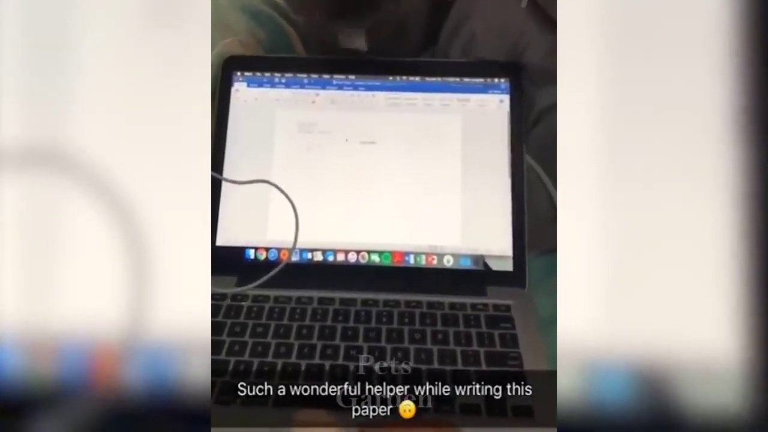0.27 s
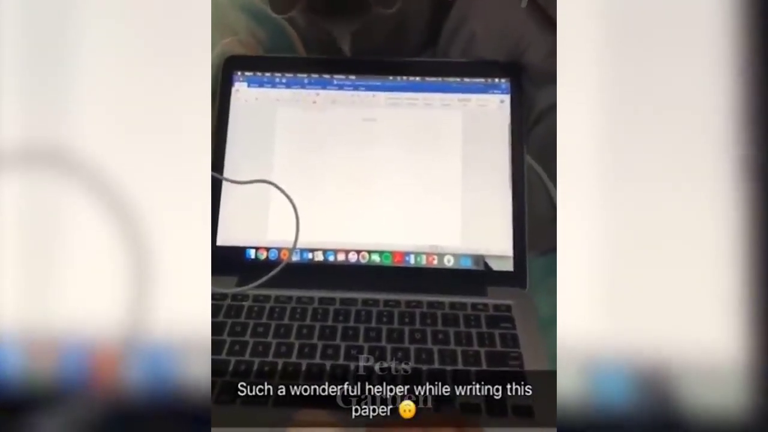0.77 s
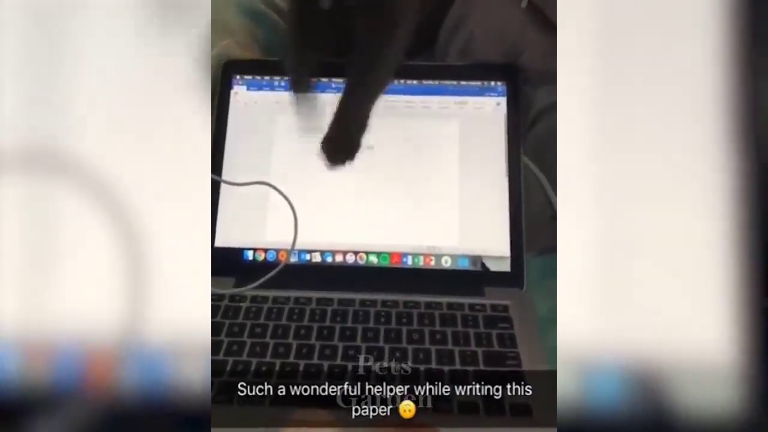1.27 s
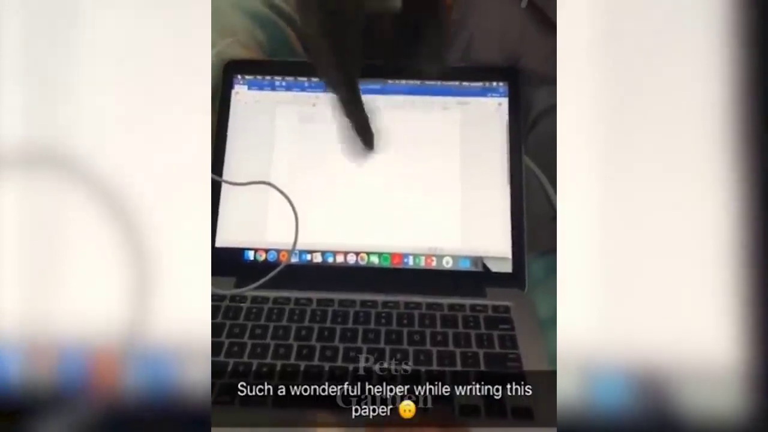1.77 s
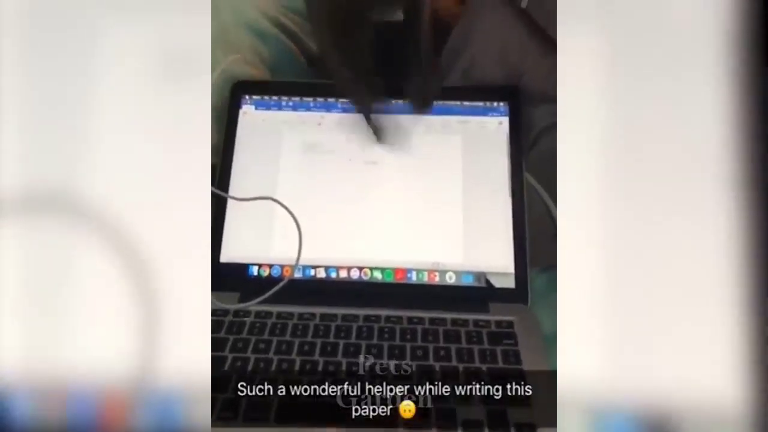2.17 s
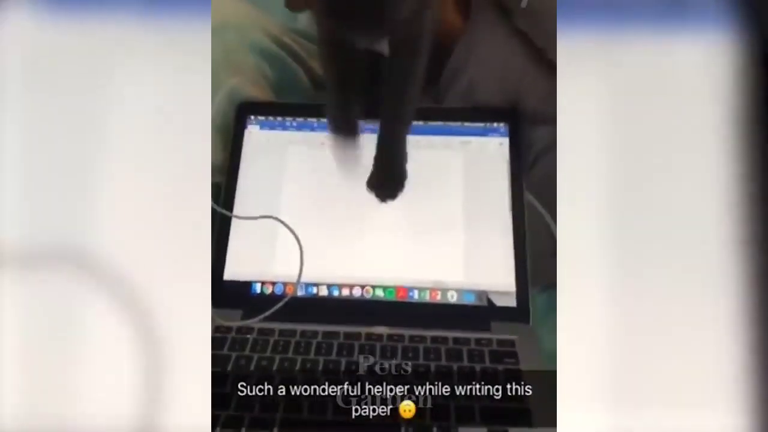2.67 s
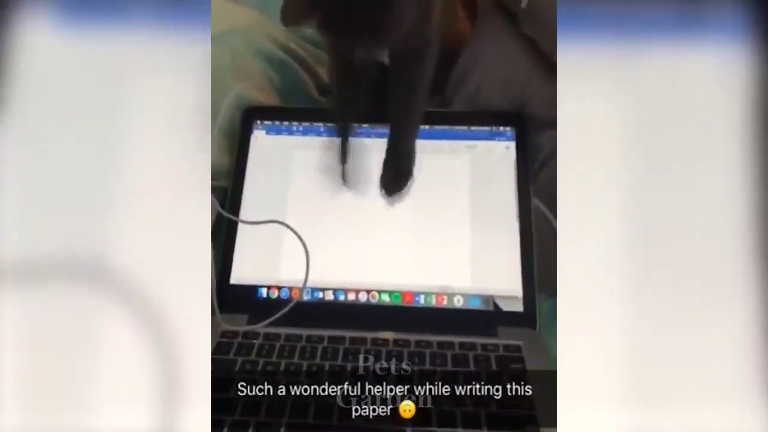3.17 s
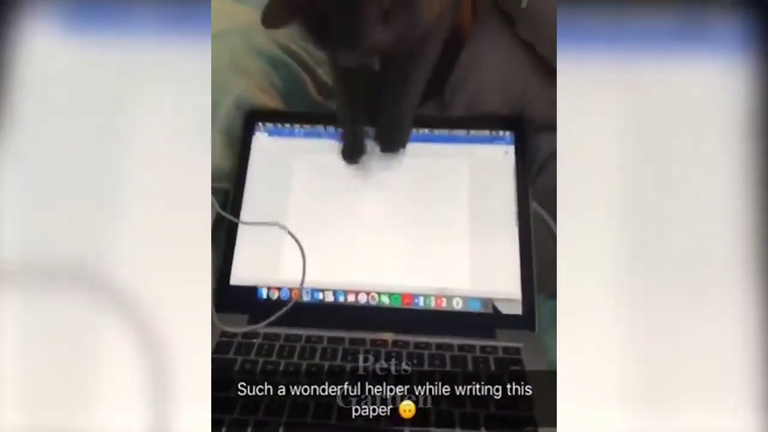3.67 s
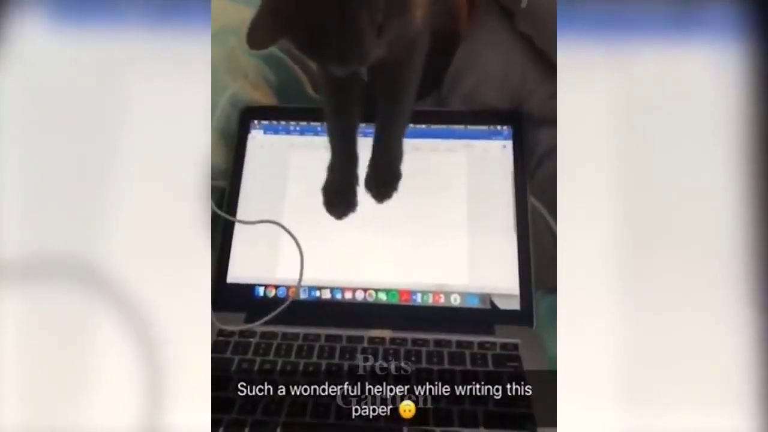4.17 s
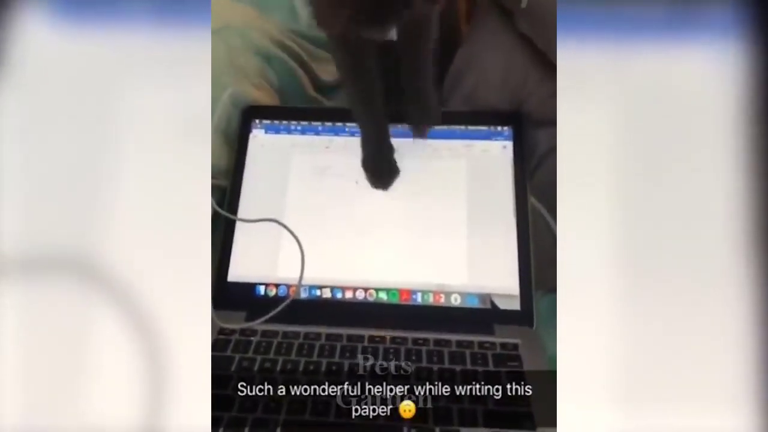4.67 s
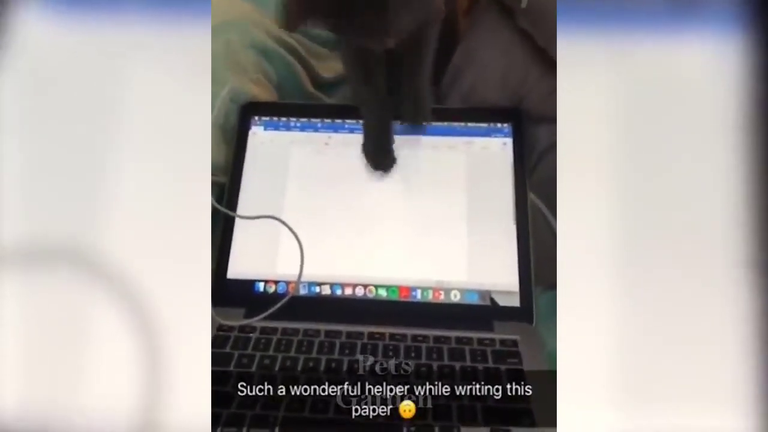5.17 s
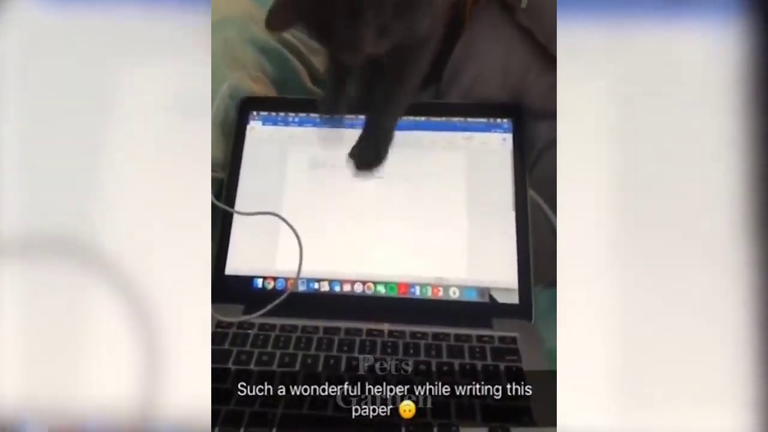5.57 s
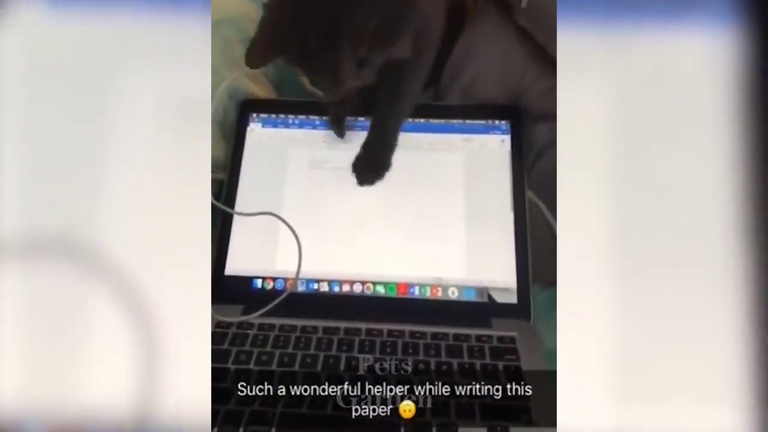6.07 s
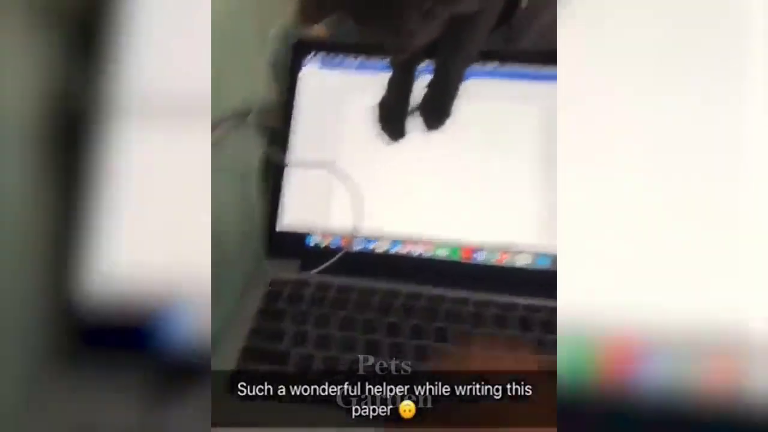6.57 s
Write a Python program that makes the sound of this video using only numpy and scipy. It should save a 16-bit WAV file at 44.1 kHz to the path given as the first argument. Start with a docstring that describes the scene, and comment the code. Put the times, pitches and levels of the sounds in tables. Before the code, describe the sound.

Uneven clicks and dull knocks of a cat pawing a laptop screen, its small collar bell jingling faintly in a quiet room.

```python
"""A cat pawing at a laptop screen

Claws tap and pads drag on the glass, exciting its damped bending modes by impact and by friction.
The lid thumps, knocks and sways on its hinge, and a pellet tinkles in the cat's collar bell.
Behind are faint squeaks, a soft puff of hiss and the hum and reverberation of a quiet room. The
microphone's gain control ducks after loud taps, and a swish swells just before the sound is cut off."""
import sys
import numpy as np
from scipy import signal
from scipy.io import wavfile
from scipy.ndimage import uniform_filter1d

SR = 44100
rng = np.random.default_rng(int(sys.argv[2]) if len(sys.argv) > 2 else 0)


def unload_wav(signal):
    """Save mono or channel-first audio to the path in sys.argv[1] as 16-bit WAV at rate SR, clipped to [-1, 1]."""
    wavfile.write(
        sys.argv[1],
        SR,
        np.round(np.clip(np.atleast_2d(signal).T, -1, 1) * 32767).astype(np.int16),
    )


N = 300895

# Claw impacts: t/s, peak level/dB, favoured low f/Hz, favoured high f/Hz, low-mode weight/dB,
# treble weight/dB, skid duration/ms, thump level/dB, thump f/Hz
CLAW_TAPS = [(1.181, -35, 1110, 3500, 4, -11.5, 10.2, -18.5, 149),
             (1.276, -7.0, 1148, 3550, -10, 1, 1.7, -20.5, 143),
             (1.2767, -9.5, 1207, 2640, -17, 1, 1.8, -44.5, 141),
             (1.2859, -29, 1200, 3200, -21, -13, 9.2, -46, 140),
             (1.497, -47, 1190, 3000, 3, -2, 2.8, -36, 75.5),
             (1.528, -43, 1050, 2900, 2, -11, 3.8, -44, 120),
             (1.5394, -31, 1260, 4350, -2.5, 7, 3.4, -32, 111),
             (1.569, -44, 1010, 3120, 1, -10, 4.8, -42, 120),
             (1.596, -50, 1150, 3200, 11, -10, 4.3, -52, 120),
             (1.9675, -34, 1080, 3940, -0.5, 12.5, 7.8, -17.5, 79.6),
             (2.004, -35, 1090, 3740, -1.5, 12, 3, -33, 151),
             (2.367, -43.5, 1290, 4600, -12, 9, 12, -55, 100),
             (2.389, -30, 1300, 2640, -2, 12, 6.6, -32.5, 226),
             (2.4039, -27, 1430, 4100, -7.5, -3, 1.2, -30.5, 75),
             (2.478, -40.5, 1340, 2500, -10, -3, 2, -49, 100),
             (2.591, -35, 1920, 3040, -20, 9, 4.8, -38, 73),
             (2.607, -18.5, 1814, 4350, -3, 10, 12.6, -27.5, 206),
             (2.6281, -23, 1700, 2320, -9, 5, 2.1, -33, 137),
             (2.671, -51.5, 1410, 3000, -7, -1, 2.1, -45, 100),
             (2.744, -46.5, 1300, 3660, -17, -9, 1.8, -55, 100),
             (2.8048, -16.5, 1310, 4430, -9, 6, 5.3, -26, 137),
             (2.887, -18, 1295, 3000, -9, 13, 1.7, -26.5, 137),
             (3.387, -34.5, 1290, 2986, -5, 10.5, 5.3, -56, 148),
             (3.392, -25.5, 1370, 3420, -4, -3, 7.4, -33.5, 160),
             (3.4346, -41.5, 1250, 3430, 9, -5.5, 1.6, -36, 73),
             (3.5691, -19.5, 1210, 3090, -8.5, 5, 5.9, -25.5, 145),
             (3.5865, -17, 1566, 3120, -6.5, 3, 4.8, -27, 71),
             (3.599, -46, 1255, 3220, 19, 14, 3.1, -42, 127), (3.625, -34, 1300, 2340, 3, 2, 1.4, -44, 73),
             (3.7329, -20.5, 1260, 4070, -11, 4.5, 7.2, -31, 71),
             (3.7518, -17.5, 1464, 4240, -1, 11.5, 1.7, -25.5, 139),
             (3.761, -29, 1280, 3680, -2, -6.5, 2.2, -40, 73),
             (3.7905, -25, 1250, 3260, 4.5, -20, 1.33, -58, 73),
             (3.896, -31, 1340, 3870, -14, -4, 2.7, -40, 89),
             (3.903, -34.5, 1320, 4050, -18, 10, 11.3, -48.5, 90),
             (3.931, -16.5, 1280, 3630, -8, 6, 7, -36.5, 103),
             (3.9443, -23, 1624, 3880, 2.5, -8, 1.4, -20, 216),
             (4.017, -19.5, 1355, 2800, -7.5, 4.5, 3.2, -30, 146),
             (4.0216, -28.5, 1290, 4430, -3, 13, 2.4, -48, 141),
             (4.493, -39.5, 1260, 2850, 21, -7, 3.8, -40, 156),
             (4.5329, -34.5, 1140, 4100, -13, -7, 4.1, -38, 84),
             (4.541, -39, 1150, 3320, -20, 17, 2.1, -26.5, 123),
             (4.5524, -32, 1110, 4330, -12, -8, 4.2, -39, 147),
             (4.6346, -14, 1810, 3830, -5, 4.5, 2.92, -29.5, 149),
             (4.781, -27.5, 1390, 3500, -8, 10, 6.3, -34, 138),
             (4.8783, -27, 1276, 3780, -13.5, -6, 2.5, -44, 118),
             (4.899, -37, 1410, 3460, -11, -10, 2.7, -45, 128),
             (5.409, -44, 1280, 3700, -8, -10.5, 2.4, -61.5, 100),
             (5.456, -25.5, 1290, 3850, -15.5, 7.5, 6.4, -36.5, 73.6),
             (5.5409, -20, 1490, 3590, -12, 7.5, 4.5, -33.5, 96.5),
             (5.72, -15.5, 1330, 3391, -16.5, 5, 3.55, -30, 136),
             (5.8091, -19, 1164, 2800, -8.5, 3.5, 4.1, -30, 168),
             (5.8337, -28, 1100, 4200, -18, 3.5, 3.36, -29.5, 130),
             (5.9326, -21.5, 1550, 3480, -9.5, -1, 3.6, -36, 207),
             (5.9446, -28, 1630, 4450, -27, -14, 3.3, -36, 135),
             (5.993, -44, 1420, 3000, 0, -11.5, 1.9, -56, 100),
             (6.0624, -21, 1130, 3610, -8, 5, 3.5, -41.5, 250),
             (6.1803, -20.5, 1490, 3200, -2.5, 2, 3.9, -30.5, 142),
             (6.3269, -25, 1260, 4570, -11, 3.5, 7.8, -40, 82),
             (6.436, -28.5, 1610, 3600, -1, 4, 7.5, -36.5, 104)]
# Modes of the glass panel, damped by paw and lid: f/Hz, level/dB, T60/s
GLASS_MODES = [(389, -11, 0.02), (575, -7.5, 0.017), (624, -13.5, 0.019), (810, -14, 0.014),
               (1107, -6, 0.02), (1259, 0.5, 0.014), (1503, -1, 0.012), (1690, 0, 0.0078),
               (2305, -11.5, 0.02), (2656, -8.5, 0.013), (3223, 4, 0.0043), (3496, -4.5, 0.0091),
               (3765, -4, 0.0081), (4315, -1.5, 0.0077), (4660, -24.5, 0.0017), (5790, -3, 0.0021),
               (6690, -20, 0.015), (7440, -13, 0.0038), (8820, -5.5, 0.00071), (9500, -36, 0.0016),
               (9450, -20, 0.014), (11200, -0.5, 0.00075), (12100, -3, 0.00079), (14800, -17, 0.001)]
# Pad blows on the lid: t/s, level/dB, lower f/Hz, upper f/Hz, relative upper level/dB
LID_KNOCKS = [(1.182, -25.5, 334, 570, 2), (1.276, -23, 334, 517, -4), (1.538, -28, 297, 650, -12.5),
              (1.969, -23, 330, 530, -9), (2.005, -26, 334, 690, -6), (2.391, -30.5, 280, 533, -6),
              (2.606, -34, 320, 552, 8.5), (2.804, -39, 280, 890, -15), (2.887, -53.5, 283, 710, -15.5),
              (3.394, -28.5, 440, 540, -9), (3.574, -30, 425, 482, -3), (3.586, -26.5, 283, 518, 2),
              (3.734, -29, 320, 510, -8.5), (3.751, -29, 344, 560, -3), (3.931, -32, 283, 875, -25),
              (3.944, -21, 285, 668, -24), (4.015, -36, 283, 534, -6), (4.489, -37.5, 282, 890, -1),
              (4.542, -32.5, 393, 647, -1.5), (4.634, -32.5, 323, 666, 4.5), (4.782, -46.5, 396, 590, 9),
              (4.877, -39.5, 374, 520, 1), (5.456, -30, 283, 664, -10), (5.54, -38, 439, 526, -8),
              (5.719, -34, 440, 520, 6.5), (5.809, -47, 307, 614, -9), (5.932, -44, 304, 690, 10),
              (6.062, -33, 287, 664, -6), (6.18, -42, 283, 686, -4), (6.329, -36.5, 428, 490, -5),
              (6.436, -36.5, 283, 540, -2)]
# Pushes that sway the lid: t/s, level/dB
LID_PUSHES = [(.45, -53), (.78, -55), (1.15, -37.5), (1.36, -40), (1.56, -50.5), (2.01, -36.5),
              (2.42, -43.5), (2.66, -41.5), (2.89, -51.5), (3.1, -51), (3.6, -42), (3.76, -42),
              (3.97, -45.5), (4.06, -56), (4.45, -55.5), (4.67, -51.5), (4.95, -46.5), (5.12, -63.5),
              (5.29, -59), (5.52, -46.5), (5.77, -55), (5.98, -48.5), (6.28, -49.5), (6.65, -65)]
# Pad strokes on the glass: start t/s, end t/s, start level/dB, end level/dB, treble tilt/dB
PAD_STROKES = [(1.189, 1.219, -56, -74, -1), (1.333, 1.436, -55.5, -75, -3.5), (1.47, 1.522, -69, -65, 0.5),
               (1.558, 1.752, -65, -72.5, 0.5), (2.014, 2.147, -60, -80.5, 0),
               (2.406, 2.606, -58.5, -62.5, 2), (2.634, 2.797, -60, -63.5, 1), (2.828, 2.87, -54, -78, 5),
               (2.917, 2.98, -70, -84, 9), (2.983, 3.322, -71.5, -77, 1), (3.33, 3.369, -79, -58, -2),
               (3.396, 3.592, -61.5, -69, 0.5), (3.638, 3.717, -61.5, -63, -1.5),
               (3.808, 3.9, -61, -60.5, 0), (3.954, 4.003, -52, -70, 9), (4.045, 4.219, -65, -72, 0),
               (4.423, 4.53, -70, -54.5, -1), (4.548, 4.627, -57, -67, 4), (4.66, 4.765, -58, -81, 4),
               (4.803, 4.86, -60, -71, 1), (4.91, 5.088, -59.5, -72, 1.5), (5.098, 5.2, -60, -74, 3),
               (5.273, 5.439, -67.5, -59, 1), (5.48, 5.517, -67, -80, -8), (5.565, 5.692, -67, -54, 3.5),
               (5.735, 5.806, -70, -55.5, 2.5), (5.817, 5.846, -53, -55.5, 3.5),
               (5.827, 5.92, -57.5, -66, 0.5), (5.958, 6.053, -74, -57.5, 6),
               (6.06, 6.114, -65, -55.5, 1.5), (6.114, 6.18, -67.5, -70, -2), (6.172, 6.328, -61, -66.5, 1),
               (6.34, 6.426, -61, -66, -1)]
# Pellet strikes in the bell: t/s, low-pair level/dB, high-pair level/dB, tick level/dB
PELLET_STRIKES = [(1.5204, -53, -62, -51), (1.5394, -53, -70, -39), (1.5484, -31.5, -50, -46),
                  (1.5704, -44, -57, -48), (1.6467, -49, -82, -49.5), (1.927, -50, -75, -54.5),
                  (1.934, -52, -74.5, -50), (1.9719, -24.5, -47, -37), (1.9878, -53, -43, -36),
                  (1.9994, -47.5, -65, -35), (2.0134, -46, -47, -42), (2.095, -52, -74, -55),
                  (2.138, -48.5, -87, -51), (2.331, -56, -76, -56), (2.34, -52, -70, -50.5),
                  (2.3695, -40, -58, -49), (2.3972, -32, -48, -36), (2.961, -44.5, -66, -52),
                  (3.045, -49.5, -76, -50), (3.1318, -45, -70, -51), (3.2255, -55, -88, -53),
                  (3.2973, -57, -65, -53), (3.3424, -58, -66, -58), (3.471, -54, -46, -49),
                  (3.6616, -49, -48, -55), (3.824, -48.5, -60, -59), (4.0043, -43, -77, -49),
                  (4.0705, -49, -85, -61), (4.0862, -49, -52, -48), (4.1215, -53, -84, -57),
                  (4.6924, -30.5, -68, -62), (4.7134, -49, -59, -52), (4.7476, -69, -67, -48),
                  (4.8265, -57, -76, -51), (4.851, -45, -76, -64), (4.9917, -40, -53, -54),
                  (4.997, -40, -55, -54), (5.0794, -49, -79, -56.5), (5.1502, -44, -80, -62),
                  (5.8734, -39, -50, -53), (5.8875, -43, -76, -62)]
# The bell's two close mode pairs and its short-lived tick modes: f/Hz, level/dB, T60/s
BELL_LOW_PAIR = [(4885, -16, .17), (4935, -21, .08)]
BELL_HIGH_PAIR = [(11850, -4, .09), (12065, -7, .07)]
BELL_TICK_MODES = [(4840, 6.5, 0.012), (5150, 5, 0.012), (5600, 1.5, 0.0093), (6730, 14.5, 0.0024),
                   (9300, -5.5, 0.0074)]
# Envelopes of the swish: t/s, dull-band level/dB, bright-band level/dB
SWISH_LEVELS = [(6.345, -62, -80), (6.42, -57, -76), (6.46, -50, -71), (6.482, -53.5, -55.5),
                (6.58, -50, -52.5), (6.667, -50, -48.5), (6.71, -52, -53.5)]
# Spectral density of the swish: f/Hz, relative level/dB
SWISH_SPECTRUM = [(290, -53.5), (500, -18.5), (542, -11.5), (892, -16.5), (1050, -10.5), (2110, -6.5),
                  (2660, -2), (3380, -10.5), (3670, -6.5), (4940, -11), (6040, -7.5), (8120, -23),
                  (11100, -22), (12500, -49), (16200, -65), (22000, -120)]
# Faint squeaks, a soft puff of hiss and a brief ring after a tap:
# t/s, level/dB, centre f/Hz, bandwidth/Hz, duration/s
NOISE_BURSTS = [(0.194, -64, 4020, 700, 0.065), (0.562, -66, 5650, 1500, 0.048),
                (2.488, -61, 4000, 120, 0.038), (5.453, -50, 1253, 80, 0.035)]
# Spectral density of the room's air noise: f/Hz, relative level/dB
AIR_SPECTRUM = [(15, -57.5), (25, -7), (45, -5.5), (103, -4.5), (192, -14), (248, -14.5), (356, -20.5),
                (427, -25), (553, -24.5), (613, -26), (1110, -28.5), (1630, -30.5), (2010, -30),
                (4950, -41.5), (11800, -46), (12500, -82.5), (22000, -120)]
# Partials of the mains hum: f/Hz, rms level/dB
HUM_PARTIALS = [(59.5, -58.5), (119.5, -59.5), (247, -73)]
# Reverberation time: f/Hz, T60/s
ROOM_DECAY = [(150, 0.1), (1200, 0.18), (3200, 0.19), (6000, 0.28), (11000, 0.38)]
# Spectrum of the reflections: f/Hz, relative level/dB
ROOM_COLOUR = [(150, -2), (1200, 2), (3000, 0.5), (4300, -5.5), (5500, -3), (7500, -8), (11800, -8.5),
               (12500, -50)]
# Microphone response, falling steeply in the top treble: f/Hz, gain/dB
MIC_RESPONSE = [(0, 0), (12000, 0), (12450, -24), (13600, -34), (16500, -44), (22050, -44)]


def claw_taps():
    """Modal excitation: the spot struck weights the glass modes. Returns direct sound and room feed."""
    direct, room_feed = np.zeros((2, N))
    hz, db, t60 = np.transpose(GLASS_MODES)
    group = np.searchsorted([950, 2100, 5000], hz)  # body, low ring, high ring, treble
    opposition = (-1.) ** np.arange(len(hz))  # neighbouring modes swing in opposite senses
    body_db, spot_db, room_feed_db = -8, 3, -12
    for s, peak_db, low_hz, high_hz, low_db, treble_db, skid_ms, _, _ in CLAW_TAPS:
        detune, polarity, spot = rng.random((3, len(hz)))
        focus_db = 8.35 + 23.5 * gain_of(peak_db)  # a hard blow picks out its favoured modes more
        low_boost, high_boost = focus_db * np.exp(-(np.log(hz / [[low_hz], [high_hz]]) / .069) ** 2)
        weight_db = np.choose(group, [body_db, low_db + low_boost, high_boost, treble_db])
        mode_db = db + weight_db + spot_db * (2 * spot - 1)
        modes = np.transpose([hz * (1 + .09 * (detune - .5)), mode_db, t60])
        phases = np.pi * (polarity > .5)
        responses = np.array([ring(modes[[k]], phases[[k]], .03) for k in range(len(hz))])
        responses *= 1 - np.exp(-np.arange(responses.shape[1]) / 4)  # contact builds over a moment
        # The skid spreads each mode in time; the modes keep their shares of the energy.
        spread = signal.fftconvolve(skid_force(skid_ms)[None], responses, axes=1)
        tap = (np.linalg.norm(responses, axis=1) / np.linalg.norm(spread, axis=1)) @ spread
        gain = gain_of(peak_db) / abs(tap).max()
        add(direct, s, gain * tap)
        add(room_feed, s, gain_of(room_feed_db) * gain * (np.cos(phases) * opposition) @ responses)
    return direct, room_feed


def skid_force(skid_ms):
    """Intermittent contact: a skidding claw exerts an uneven force that rises fast and decays."""
    contacts = rng.standard_normal(500)
    progress = np.arange(500) / SR * 1000 / skid_ms
    envelope = np.minimum(progress / .11, 1) * (progress < 1) * np.exp(-1.4 * progress)
    return contacts * abs(contacts) * envelope


def lid_thumps():
    """Damped oscillation: the soft pad behind each tap pushes the lid into a few low swings."""
    out, t = np.zeros(N), np.arange(3500) / SR
    lag_share = .605  # the lid gives way this far into the skid
    for s, *_, skid_ms, db, hz in CLAW_TAPS:
        overtone = .5 * np.sin(2 * np.pi * 1.702 * hz * t + 6 * rng.random()) * t / (t + .00056)
        swing = np.sin(2 * np.pi * hz * t) + overtone
        t60 = .048 * np.sqrt(140 / hz)
        envelope = gain_of(db - 60 * t / t60) * (1 - np.exp(-t / .0012))
        add(out, s + lag_share * skid_ms / 1000, -envelope * swing)
    return out


def lid_knocks(rise_s=.0015, t60=.02):
    """Resonance: a soft pad rings two hollow modes of the lid."""
    out, t = np.zeros(N), np.arange(2500) / SR
    for s, db, low_hz, high_hz, high_db in LID_KNOCKS:
        modes = [(low_hz, 0, t60), (high_hz, high_db, t60)]
        tones = ring(modes, 2 * np.pi * rng.random(2), len(t) / SR)
        add(out, s, gain_of(db) * tones * (1 - np.exp(-t / rise_s)))
    return out


def lid_sway(centre_hz=34, build_db_per_s=172.5, settle_db_per_s=114):
    """Driven oscillation: with each push the lid's swing on its hinge builds up, then settles."""
    t = np.arange(N) / SR
    wander = unit_rms(sum(np.sin(2 * np.pi * (f * t + rng.random())) for f in np.geomspace(.5, 6, 12)))
    hz = centre_hz * np.exp(.13 * wander)
    envelope = sum(gain_of(db + np.minimum(build_db_per_s * (t - s), settle_db_per_s * (s - t)))
                   for s, db in LID_PUSHES)
    return np.sqrt(2) * envelope * np.sin(2 * np.pi * np.cumsum(hz) / SR)


def pad_drag(slips_per_s=2500, grip_waver_db=4):
    """Stick-slip friction: tiny slips of a pad ring the glass, at another spot on each stroke."""
    grip = gain_of(grip_waver_db * smooth_noise(N, 500))
    slips = gain_of(1.8 * np.minimum(rng.exponential(1, N), 5)) * rng.choice([-1, 1], N)
    slips *= rng.random(N) < slips_per_s / SR
    hz, db, t60 = np.transpose(GLASS_MODES)
    soft_db = db - 3 * (hz > 7000)  # soft pads excite the treble modes less
    damped_t60 = .35 * t60  # a resting pad shortens the ring
    low, out = hz < 2100, np.zeros(N)
    for start, end, start_db, end_db, tilt_db in PAD_STROKES:
        detune, spot = rng.random((2, len(hz))) - .5
        span = slice(round(start * SR) - 800, round(end * SR) + 800)
        modes = np.transpose([hz * (1 + .2 * detune), soft_db + 8 * spot, damped_t60])
        responses = [ring(modes[band], np.pi * np.flatnonzero(band), .027) for band in (low, ~low)]
        dull, bright = (unit_rms(signal.oaconvolve(slips[span], r, "same")) for r in responses)
        tilt = gain_of(tilt_db)
        rub = (dull / tilt + bright * tilt) / np.hypot(tilt, 1 / tilt)
        out[span] += rub * envelope_of([(start, start_db), (end, end_db)])[span]
    return grip * out


def collar_bell(ring_s=.25, swell_s=.004, flutter_db=2.5):
    """Beating: a bouncing pellet ticks the shell, whose close mode pairs ring on and interfere."""
    out, n = np.zeros(N), np.arange(round(ring_s * SR))
    swell = 1 - np.exp(-n / SR / swell_s)  # the ring builds as the pellet rolls
    for s, low_db, high_db, tick_db in PELLET_STRIKES:
        phases, bounces = 2 * np.pi * rng.random(9), rng.random((3, 2))
        shell = gain_of(low_db) * ring(BELL_LOW_PAIR, phases[:2], ring_s)
        shell += gain_of(high_db) * ring(BELL_HIGH_PAIR, phases[2:4], ring_s)
        tick = gain_of(tick_db) * ring(BELL_TICK_MODES, phases[4:], ring_s) * np.minimum(n / 70, 1)
        flutter = gain_of(flutter_db * smooth_noise(len(n), 250))  # fur brushes the ringing bell
        add(out, s, flutter * shell * swell + tick)
        for delay, strength in bounces:
            add(out, s + .0017 + .0079 * delay, .57 * (2 * strength - 1) * tick)
    return out


def swish(crossover_hz=3800):
    """Complementary filtering: a soft rush of noise whose upper band swells later than its lower."""
    rush = shaped_noise(SWISH_SPECTRUM, patchy_db=1.3, size=512)
    dull = signal.oaconvolve(rush, signal.firwin(101, crossover_hz, fs=SR), "same")
    rows = np.array(SWISH_LEVELS)
    return envelope_of(rows[:, :2]) * unit_rms(dull) + envelope_of(rows[:, ::2]) * unit_rms(rush - dull)


def noise_bursts():
    """Modulation: low-passed noise on a carrier hisses if wide in band, squeaks or rings if narrow."""
    out = np.zeros(N)
    for s, db, hz, width_hz, length_s in NOISE_BURSTS:
        t = np.arange(round(length_s * SR)) / SR
        pole = np.exp(-np.pi * width_hz / SR)
        baseband = signal.lfilter([1], [1, -pole], rng.standard_normal(8000))[:len(t)]
        band = unit_rms(baseband * np.cos(2 * np.pi * hz * t))
        add(out, s, gain_of(db) * band * np.hanning(len(t)) ** .5)
    return out


def reverberation(x, onset_s=.011):
    """Diffuse reflection: sparse echoes of random sign, each band decaying at its own rate."""
    echoes = np.zeros(SR // 2)
    slots = np.arange(0, SR // 2 - 20, 20)
    echoes[slots + rng.integers(0, 20, len(slots))] = rng.choice([-1., 1.], len(slots))
    hz, frame_s, spectra = signal.stft(echoes, SR, nperseg=256)
    decay_db = 60 * frame_s / value_at(ROOM_DECAY, hz)[:, None]
    spectra *= gain_of(value_at(ROOM_COLOUR, hz)[:, None] - decay_db)
    tail = signal.istft(spectra, SR, nperseg=256)[1]
    t = np.arange(len(tail)) / SR
    tail *= np.minimum(t / onset_s, 1) ** 3
    tail *= 1 + .97 * np.exp(-((t - .014) / .0095) ** 2)  # the nearest wall answers first and strongest
    return signal.fftconvolve(x, tail / np.linalg.norm(tail))[:N]


def room_tone(air_db=-52, waver_db=3.6):
    """Line and continuous spectra: mains hum, wavering in level and phase, over air noise."""
    t, hum = np.arange(N) / SR, np.zeros(N)
    for hz, db in HUM_PARTIALS:
        waver = sum(np.sin(2 * np.pi * (f * t + rng.random())) / np.sqrt(f)
                    for f in np.geomspace(.3, 8, 16))
        phase = 2 * np.pi * hz * t + smooth_noise(N, 4000)
        hum += np.sqrt(2) * gain_of(db + waver_db * unit_rms(waver)) * np.sin(phase)
    return gain_of(air_db) * shaped_noise(AIR_SPECTRUM, patchy_db=2.62, size=2048) + hum


def ring(modes, phases, seconds):
    """Free vibration: a sum of decaying sines from rows of f/Hz, level/dB, T60/s."""
    hz, db, t60 = np.transpose(modes)[:, :, None]
    t = np.arange(round(seconds * SR)) / SR
    decay = gain_of(db - 60 * t / np.maximum(t60, .001))
    return (decay * np.sin(2 * np.pi * hz * t + phases[:, None])).sum(0)


def shaped_noise(spectrum, patchy_db, size):
    """Fourier synthesis: noise of unit rms from random spectra with drifting louder patches."""
    hz = np.fft.rfftfreq(size, 1 / SR)
    real, imag, patches = rng.standard_normal((4 * N // size + 5, len(hz), 3)).T
    patches = unit_rms(uniform_filter1d(uniform_filter1d(patches, size=10, axis=0), size=10, axis=1))
    spectra = (real + 1j * imag) * gain_of(value_at(spectrum, hz)[:, None] + patchy_db * patches)
    return unit_rms(signal.istft(spectra, nperseg=size, noverlap=3 * size // 4)[1][:N])


def smooth_noise(length, window):
    """Moving average: white noise becomes a slow fluctuation of unit rms."""
    return unit_rms(uniform_filter1d(rng.standard_normal(length), size=window))


def envelope_of(rows, fade_s=.015):
    """Exponential segments: gain through rows of t/s, level/dB, fading at both ends."""
    s, db = np.transpose(rows)
    return gain_of(np.interp(np.arange(N) / SR, [s[0] - fade_s, *s, s[-1] + fade_s], [-110, *db, -110]))


def value_at(points, hz):
    """Interpolation on a logarithmic frequency axis."""
    f, value = np.transpose(points)
    return np.interp(np.log(hz + 1), np.log(f + 1), value)


def gain_of(db):
    """Amplitude ratio of a level in decibels."""
    return 10 ** (np.asarray(db) / 20)


def unit_rms(x):
    """Normalisation to an rms of 1."""
    return x / np.sqrt(np.mean(x ** 2) + 1e-20)


def add(mix, s, sound):
    """Superposition of a sound starting at s seconds."""
    part = mix[round(s * SR):][:len(sound)]
    part += sound[:len(part)]


def scene():
    """Superposition: direct sound, reflections and background sum at one microphone."""
    claws, claw_feed = claw_taps()
    lid = lid_thumps() + lid_knocks()
    rub, bell = pad_drag(), collar_bell()
    room = reverberation(claw_feed + gain_of(-5) * rub + gain_of(-10) * bell + gain_of(-11.5) * lid)
    mix = claws + lid + lid_sway() + rub + bell + swish() + noise_bursts() + room + room_tone()
    return np.array([mix, mix])


def record(dry):
    """Filtering and compression: microphone colour, ducking after loud taps, a cut, a band limit."""
    threshold_db, duck_share, peak_fall_db_per_s = -17, .21, 72
    cut_s, band_limit_hz = 6.713, 16500
    t = np.arange(N) / SR
    hz, db = np.transpose(MIC_RESPONSE)
    coloured = signal.oaconvolve(dry, signal.firwin2(301, hz, gain_of(db), fs=SR)[None], "same")
    power_db = 10 * np.log10(signal.lfilter(np.ones(100) / 100, [1], coloured[0] ** 2) + 1e-12)
    fall_db = peak_fall_db_per_s * t
    held_db = np.maximum.accumulate(power_db + fall_db) - fall_db  # peak detector with steady release
    excess_db = np.maximum(held_db - threshold_db, 0)
    ducked = coloured / gain_of(duck_share * signal.lfilter(np.ones(250) / 250, [1], excess_db))
    cut = np.clip((cut_s - t) / .003, 0, 1)
    lowpass = signal.firwin(401, band_limit_hz, window=("kaiser", 9), fs=SR)
    return signal.oaconvolve(ducked * cut, lowpass[None], "same")


dry = scene()
out = record(dry)
unload_wav(out)
```